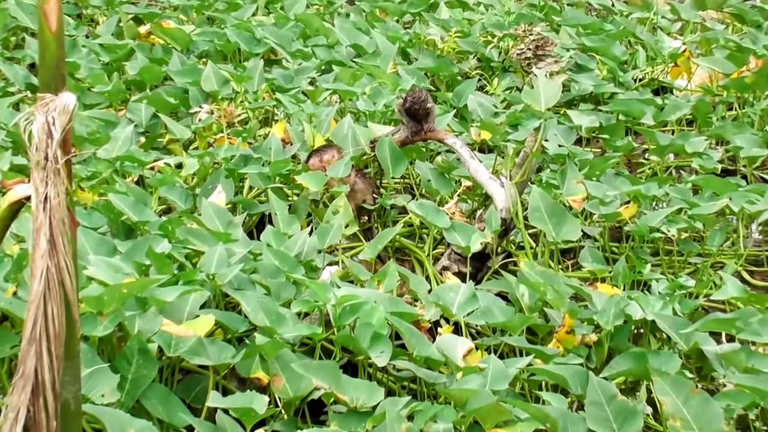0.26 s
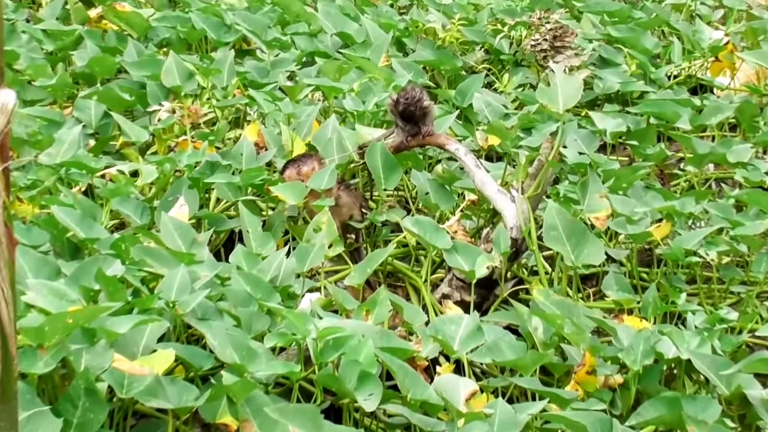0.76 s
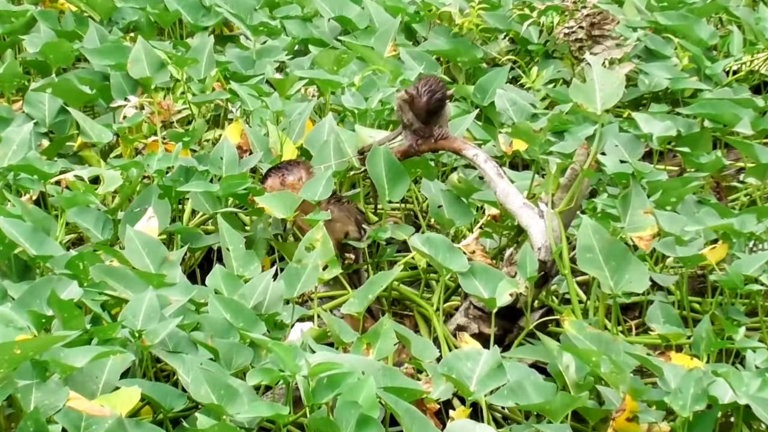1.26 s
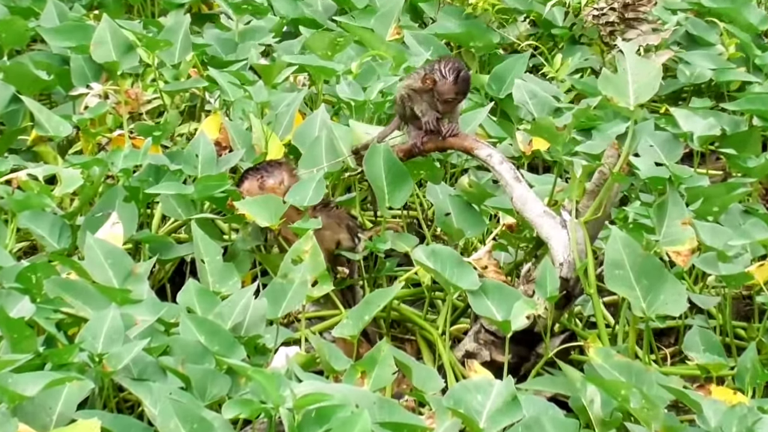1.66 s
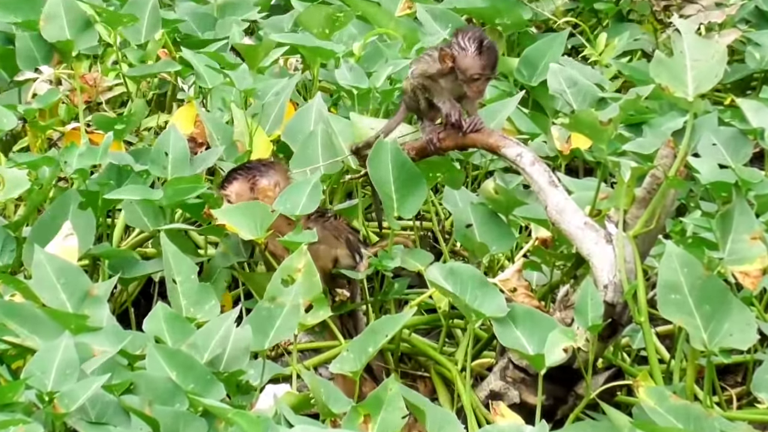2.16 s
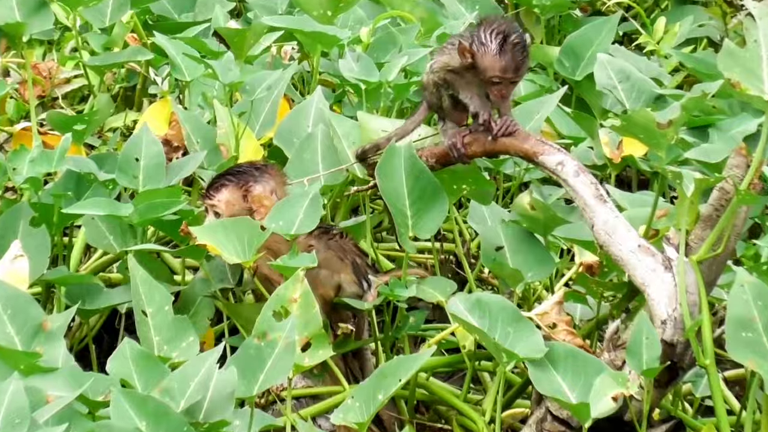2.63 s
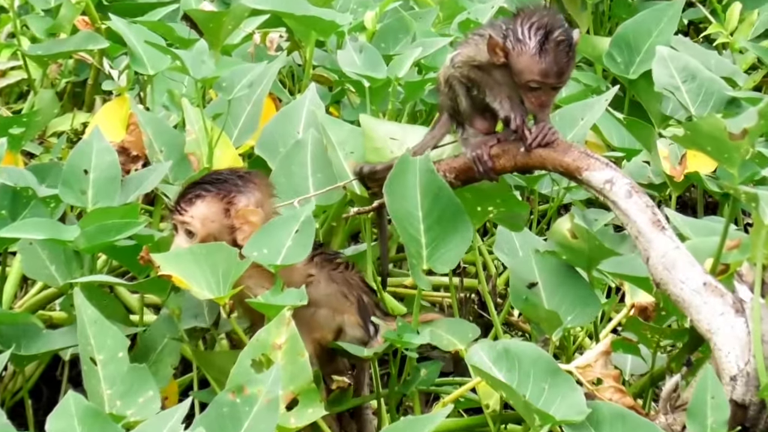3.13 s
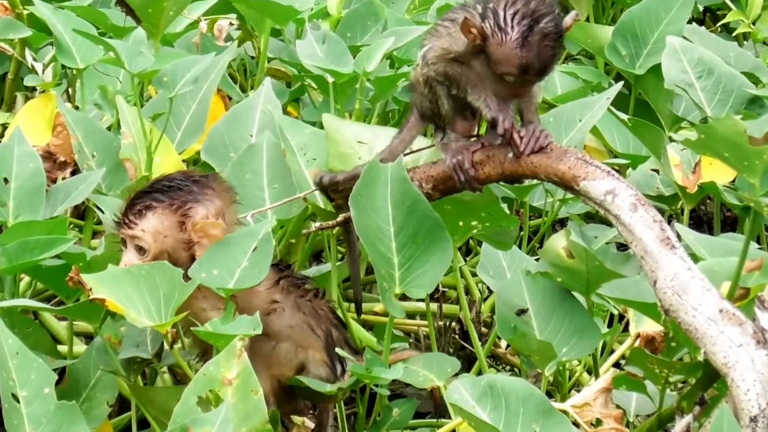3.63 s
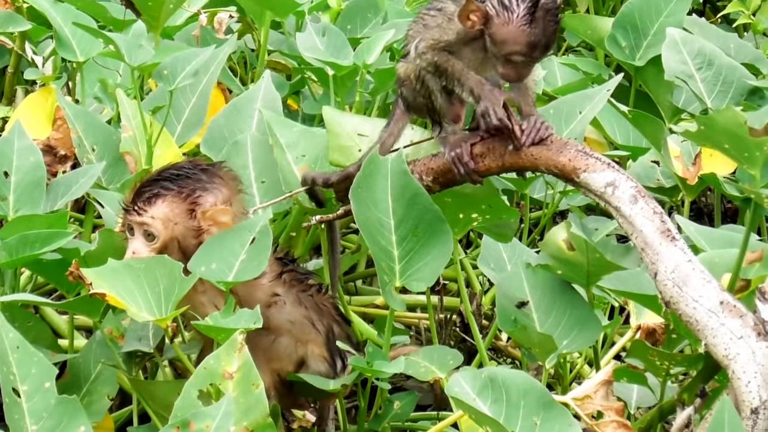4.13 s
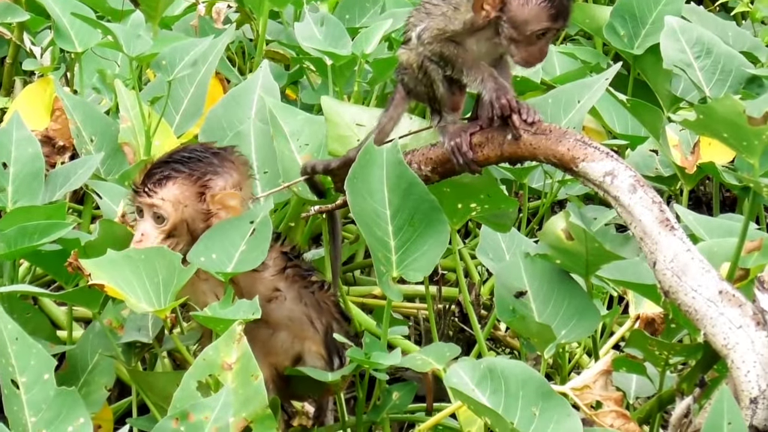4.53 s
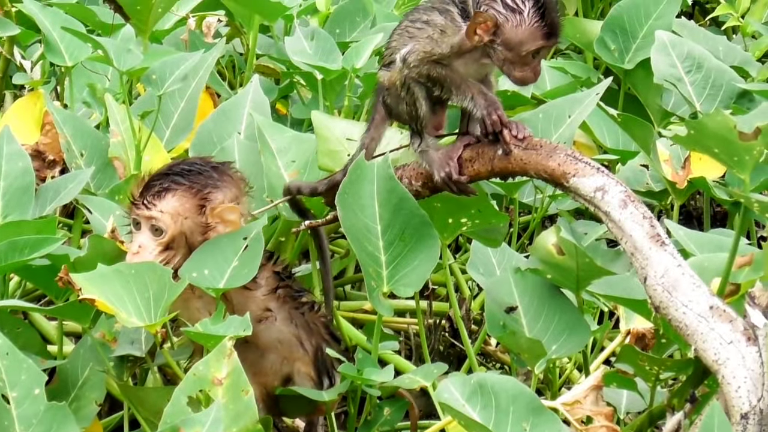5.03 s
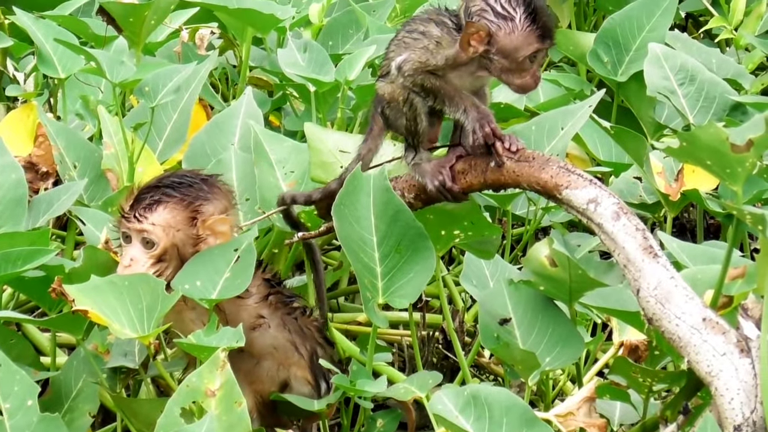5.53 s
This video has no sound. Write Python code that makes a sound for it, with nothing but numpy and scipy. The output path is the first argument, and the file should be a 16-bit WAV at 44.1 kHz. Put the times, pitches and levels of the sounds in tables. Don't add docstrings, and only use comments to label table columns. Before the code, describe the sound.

Outdoors in thick foliage, insects trill and wind rumbles while small monkeys chirp, coo, and finally scream sharply twice.

```python
import sys
import numpy as np
from scipy import signal
from scipy.fft import rfft, irfft, next_fast_len
from scipy.io import wavfile
from scipy.ndimage import uniform_filter1d, minimum_filter1d, map_coordinates

SR = 44100
rng = np.random.default_rng(int(sys.argv[2]) if len(sys.argv) > 2 else 0)


def store_wav(level_fs):
    pcm = np.round(np.clip(np.atleast_2d(level_fs), -1, 1) * 32767)
    wavfile.write(sys.argv[1], SR, pcm.T.astype(np.int16))


def elevation(decibels):
    levels = np.asarray(decibels, float)
    return 10 ** (levels / 20)


N = 254898

# f/Hz, level/dB
THROAT_OPEN = [(1000, -12), (2500, -4), (4000, 4.5), (5300, 0), (6300, -11.5), (7300, 15), (9000, -25),
               (10500, -1.5), (12000, -34.5)]


def unit(x):
    return x / np.sqrt(np.mean(x ** 2) + 1e-20)


def along(points, hz):
    f, v = np.transpose(points)
    return np.interp(np.log(hz + 1), np.log(f + 1), v)


def curves(rows, t):
    s, *cols = np.transpose(rows)
    return [np.interp(t, s, c) for c in cols]


def wobble(rate, size=N):
    knots = rng.standard_normal(size // 8 + 9)
    return map_coordinates(knots, [np.arange(size) * rate / SR])


def ramp(t, start, length):
    return np.clip((t - start) / length, 0, 1)


def swells(rows, t):
    total = 0
    for s, rise, fall, *db in rows:
        distance = np.where(t < s, (s - t) / rise, (t - s) / fall)
        total = total + elevation(np.array(db)[:, None] - 20 * distance)
    return total


def filtered(x, response):
    m = next_fast_len(N + SR // 2)
    return irfft(rfft(x, m) * response(np.fft.rfftfreq(m, 1 / SR)), m)[..., :N]


def resonance(centre, width):
    return lambda f: 1j * f * width / (centre * centre - f * f + 1j * f * width)


def placed(x, pan_db, lead):
    side = np.array([[.5], [-.5]])
    return filtered(x, lambda hz: elevation(pan_db(hz) * side) * np.exp(1j * lead(hz) * side))


def direction(pan_db, lead_s):
    return lambda hz: pan_db + 0 * hz, lambda hz: 2 * np.pi * hz * lead_s


def rush(gain, patchy_db):
    # f/Hz, likeness (0 to 1)
    alike = [(60, 1), (290, 0.85), (640, 0.018), (1400, 0.7), (3100, 1), (6000, 1), (8000, 0.67),
             (10000, 0.03)]
    # f/Hz, left minus right/dB
    lean = [(60, -5.5), (200, -2.5), (700, -0.5), (1300, 0)]
    z = signal.stft(rng.standard_normal((2, N)), nperseg=512)[2]
    field = uniform_filter1d(rng.standard_normal(z.shape[1:]), size=5, axis=0)
    field = uniform_filter1d(field, size=9, axis=1)
    pair = signal.istft(z * elevation(patchy_db * unit(field)), nperseg=512)[1][:, :N]

    def mid_side(hz):
        turn = np.arccos(np.clip(along(alike, hz), -1, 1)) / 2
        return gain(hz) * [np.cos(turn), np.sin(turn)]

    mid, side = filtered(pair, mid_side)
    stereo = np.array([mid + side, mid - side])
    return unit(filtered(stereo, lambda hz: elevation(np.outer([.5, -.5], along(lean, hz)))))


def voice(calls, throat, jitter, shimmer_db, edge_s, count, open_db=0, effort=0):
    out = np.zeros(N)
    for rows in calls:
        i = np.arange(round(rows[0][0] * SR), round(rows[-1][0] * SR))
        size = len(i)
        hz, db = (uniform_filter1d(c, size=200) for c in curves(rows, i / SR))
        unsteady = 1 + jitter * wobble(294.3, size) + 0.00595 * wobble(25.4, size)
        phase = 2 * np.pi * np.cumsum(hz * unsteady) / SR
        fade = np.clip(np.minimum(i - i[0], i[-1] - i) / (edge_s * SR), 0, 1)
        for k in range(1, count + 1):
            level = db + along(throat, k * hz) - along(throat, hz) + shimmer_db * wobble(260, size)
            if k > 1:
                level = level + open_db + effort * np.log2(k) * (db - db.max())
            if k > 2:
                level = level + 2.5 * wobble(25, size)
            audible = k * hz < SR / 2.3
            out[i] += np.sqrt(2) * fade * elevation(level) * audible * np.sin(k * phase + k)
    return out


def glide(rows, peak, head_db, tail_db, early=0):
    return [[(s, a, db - head_db),
             (s + peak * length, a + (peak + early) * (b - a), db),
             (s + length, b, db - tail_db)] for s, length, a, b, db in rows]


def arch(rows, rise, fall, head_db, tail_db):
    u = np.linspace(-1, 1, 41)
    bow = np.where(u < 0, abs(u) ** rise, abs(u) ** fall)
    drop_db = np.where(u < 0, head_db, tail_db) * bow
    return [np.transpose([s + length * (u + 1) / 2, top + (end - top) * bow, db - drop_db])
            for s, length, top, end, db in rows]


def weather():
    # t/s, level/dB
    wind = [(0, -34.5), (2.4, -34.5), (4.1, -36), (4.4, -36), (5.4, -35), (5.78, -34)]
    # f/Hz, level/dB per Hz
    rumble_colour = [(13, -48), (22, -18), (36, -15), (54, -2.5), (141, 0.5), (214, -4), (242, -4),
                     (275, -11), (300, -16), (341, -22.5), (392, -30.5), (422, -44), (450, -56), (580, -78),
                     (990, -120)]
    # f/Hz, level/dB per Hz
    air = [(210, -9), (350, -3.5), (422, -1), (693, -1.5), (922, -10.5), (2010, -16), (2650, -20.5),
           (4400, -23.5), (4800, -30.5), (6800, -25), (8840, -61), (15000, -120)]
    air_top = [(8500, -13.5), (10600, -18), (12500, -23), (15600, -25.5)]
    hiss_colour = [p for p in air if p[0] < 7000] + air_top
    rumble = rush(lambda hz: elevation(along(rumble_colour, hz)), patchy_db=-0.73)
    hiss = rush(lambda hz: elevation(along(hiss_colour, hz)), patchy_db=2.0)
    gust_db = curves(wind, np.arange(N) / SR)[0] + 0.36 * wobble(4.3)
    return elevation(gust_db) * rumble + elevation(-61 + 1.5) * hiss


def chorus():
    # f/Hz, width/Hz, level/dB, pulse rate/Hz
    bands = [(7610, 180, -77.5, 16), (7950, 55, -73, 110), (9440, 640, -68, 33)]
    t = np.arange(N) / SR
    out = 0
    for centre, width, db, rate in bands:
        band = rush(lambda hz: abs(resonance(centre, width)(hz)) ** 2, patchy_db=1.0)
        out = out + elevation(db + wobble(6.13) + 2 * np.sin(2 * np.pi * rate * t)) * band
    return out


def katydid():
    # first end t/s, last end t/s, first level/dB, last level/dB
    bouts = [(0.028, 1.382, -54.5, -53.5), (4.706, 5.77, -58, -54)]
    # f/Hz, level/dB
    wing = [(7600, -40), (8400, -17), (8750, -2), (9050, 0), (9400, -4), (9800, -5), (10100, -20),
            (11000, -45)]
    t = np.arange(N) / SR
    phrase_s, tooth_hz = .121, 9105
    swell = 0
    for a, b, first_db, last_db in bouts:
        for end, db in np.linspace((a, first_db), (b, last_db), round((b - a) / phrase_s) + 1):
            rise = np.clip((t - end + 0.14) / 0.078, 0, 1) ** 1.13
            swell = swell + elevation(db - 4.5) * rise * np.clip((end - t) / 0.016, 0, 1)
    stroke = 2 * np.pi * 125.3 * t
    scrape = np.exp(.55 * np.cos(stroke) + .4 * np.cos(3 * stroke)) * rng.standard_normal((2, N))
    comb = 1 + .5 * np.cos(stroke) + 1.8 * np.cos(2 * stroke)
    scrape[0] += .12 * comb * np.sin(2 * np.pi * tooth_hz * t + .6 * wobble(30))
    ring = filtered(scrape[0] + scrape * [[0], [1]], lambda hz: elevation(along(wing, hz)))
    return swell * unit(ring)


def cricket():
    # start t/s, end t/s, level/dB
    bouts = [(-.1, .645, -75), (1.41, 3.12, -76.5), (3.12, 4, -84), (4, 4.8, -77), (4.8, 5.4, -83),
             (5.4, 5.9, -78)]
    t = np.arange(N) / SR
    beat = ((t - 1.716) * 22.0 + .25) % 1 / 22.0 - .25 / 22.0
    pulses = np.exp(-(beat / 0.0036) ** 2)
    pulses += np.exp(-((beat - .0145) / 0.005) ** 2)
    pulses += np.exp(-((beat - .029) / 0.001) ** 2)
    gain = sum(elevation(db) * (ramp(t, a - .03, .06) - ramp(t, b - .03, .06)) for a, b, db in bouts)
    return gain * elevation(5 + 2 * wobble(20)) * pulses * np.sin(2 * np.pi * 4920 * t + wobble(80))


def snaps():
    # t/s, peak level/dB, knock f/Hz, crack level/dB
    hits = [(0.071, -72, 600, -3.5), (0.3511, -45.5, 593, -27), (0.61, -62, 730, -24),
            (1.254, -70, 660, -10), (3.6499, -42.5, 727, -14.5), (3.878, -76, 606, -16),
            (5.078, -70, 724, -11)]
    # f/Hz, width/Hz, level/dB
    modes = [(1380, 88, -5), (1790, 160, 3), (2090, 200, -13), (2800, 200, 5), (3330, 160, 3),
             (4260, 380, -28)]
    tone = [(300, -24), (800, 17.0), (3500, 11.0), (8000, 14.5), (16000, -9)]  # f/Hz, level/dB
    out, t = np.zeros(N + SR), np.arange(SR // 10) / SR
    for s, db, hz, crack_db in hits:
        crack = ramp(t, 0, 0.0017) * elevation(crack_db + 15.0 - 60 * t / 0.015) * rng.standard_normal(len(t))
        knock = ramp(t, 0.00067, 0.0017) * elevation(-60 * t / 0.026)
        knock = knock * np.sin(2 * np.pi * hz * (t + 10.3 * t * t))
        out[round(s * SR):][:len(t)] += elevation(db + 6.5) * (crack + knock)

    def wood(hz):
        ringing = sum(elevation(db) * resonance(c, w)(hz) for c, w, db in modes)
        return elevation(along(tone, hz)) * (0.3 + ringing)

    return filtered(out[:N], wood)


def bird():
    # start t/s, length/s, from f/Hz, to f/Hz, peak level/dB
    pipes = [(.2, 0.11, 1300, 1594, -70), (.57, 0.097, 1320, 1790, -69), (4.062, 0.021, 1420, 1700, -48),
             (4.14, 0.1, 1450, 1770, -66), (4.77, 0.098, 1394, 1860, -67), (5.59, 0.11, 1400, 1880, -68)]
    return voice(glide(pipes, .7, 9, 3), THROAT_OPEN, .006, 2, .015, count=1)


def middle_monkey():
    # start t/s, length/s, from f/Hz, to f/Hz, peak level/dB
    chirp_rows = [
        (1.165, 0.028, 1213, 1320, -41.5),
        (2.88, 0.057, 1152, 1202, -44),
        (2.99, 0.055, 1326, 1245, -39.5),
        (4.941, 0.048, 990, 1087, -49.5),
    ]
    # t/s, pitch f/Hz, fundamental level/dB
    long_coo = [(2.13, 1072, -52), (2.16, 1112, -45), (2.242, 1178, -41.5), (2.29, 1126, -46.5),
                (2.36, 1243, -38), (2.604, 1325, -37), (2.66, 1310, -44), (2.68, 1180, -58)]
    # f/Hz, level/dB
    throat_chirp = [(900, 3), (1300, 4.5), (1800, -16), (2500, -22.5), (3600, -13.5), (5100, -25),
                    (6500, -45)]
    throat_shut = [(1100, -3.5), (2000, -28), (3200, -25), (4200, -49)]
    throat_coo = [(500, 80), (1300, 8.5), (2500, -17), (3800, -14.5), (5200, -52), (6300, -32), (7700, -49),
                  (9000, -22.5), (10400, -25.5), (13000, -64)]
    first, *chirps, hum = glide(chirp_rows, peak=0.57, head_db=-2.3, tail_db=7, early=0.26)
    calls = voice([first], throat_chirp, 0.0034, 0.64, 0.0056, count=4, effort=1.5)
    calls += voice(chirps, throat_chirp, 0.0018, 0.58, 0.011, count=4, open_db=-9.0)
    calls += voice([hum], throat_shut, 0.0038, 1.7, 0.0066, count=3)
    calls += voice([long_coo], throat_coo, 0.0013, 0.18, 0.011, count=9)
    return placed(calls, *direction(3.0, 2e-5))


def far_monkey():
    # start t/s, length/s, from f/Hz, to f/Hz, peak level/dB
    peep = [(1.26, 0.094, 572, 542, -57)]
    # start t/s, length/s, top f/Hz, end f/Hz, peak level/dB
    coo = [(3.24, .32, 582, 450, -53)]
    # f/Hz, level/dB
    throat = [(400, -14), (700, 2), (900, -24), (1040, -16), (1170, -25), (2000, -40)]
    calls = arch(coo, rise=2.23, fall=1.5, head_db=-2.5, tail_db=2.0)
    calls += glide(peep, peak=0.22, head_db=1, tail_db=8)
    return placed(voice(calls, throat, 0.013, 0.98, 0.017, count=3), *direction(.4, 1e-4))


def left_monkey():
    # start t/s, length/s, from f/Hz, to f/Hz, peak level/dB
    yelp = [(1.31, 0.0316, 774, 1190, -48.5)]
    # t/s, pitch f/Hz, fundamental level/dB
    soft_coo = [(1.83, 790, -59.5), (1.862, 822, -59.5), (1.938, 882, -48.5), (2.05, 889, -46),
                (2.132, 876, -49), (2.178, 845, -50.5), (2.206, 799, -58.5), (2.225, 754, -63),
                (2.25, 700, -66)]
    wide_coo = [(2.435, 716, -58), (2.473, 838.6, -53.5), (2.491, 882, -51.5), (2.535, 934, -51),
                (2.671, 908, -51), (2.731, 849, -54.5), (2.741, 818, -62.5), (2.755, 724, -63),
                (2.775, 685, -67)]
    cry_start = [(3.015, 876, -55.5), (3.045, 1058, -62), (3.098, 1072, -57.5)]
    cry = [(3.088, 1093, -50), (3.11, 1260, -43), (3.129, 1326, -40), (3.161, 1168, -43.5),
           (3.198, 1167, -45), (3.24, 1083, -51.5), (3.298, 1066, -51), (3.376, 932, -55.5),
           (3.407, 789, -69)]
    # f/Hz, level/dB
    throat_yelp = [(800, -2), (1000, 3.5), (1750, -5), (2150, -29), (2600, -30), (3100, -12), (3600, -7),
                   (4300, -21), (5500, -30)]
    throat_coo = [(600, 19.5), (960, 2), (1300, 11), (1800, 6.5), (2700, -18.5), (3600, -5.5), (4500, -25),
                  (5300, -25), (6500, -79), (12000, -69)]
    throat_cry = [(800, -2), (1300, 7), (1900, 4), (2600, -19), (3600, 5), (4400, -20.5), (5300, -10.5),
                  (6000, -30), (6600, -18), (8000, -49)]
    yelps = glide(yelp, peak=0.37, head_db=9.0, tail_db=9)
    calls = voice(yelps, throat_yelp, 0.0065, 2.3, 0.0093, count=5, open_db=2.0)
    for coo, open_db in ((soft_coo, 0.1), (wide_coo, 7)):
        calls += voice([coo], throat_coo, 0.0013, 0.19, 0.0027, count=9, open_db=open_db, effort=0.25)
    calls += voice([cry_start, cry], throat_cry, 0.0035, 1.1, 0.0093, count=6)
    return placed(calls, *direction(9.6, 9e-5))


def wheeze():
    # peak t/s, rise/s, fall/s, level/dB
    breaths = [(1.4, 0.53, 3, -79.5), (2, 0.42, 1.64, -79), (4, .05, 0.64, -70.5), (4.2, 0.42, 0.17, -87),
               (4.5, 0.11, 0.19, -56), (5.45, 0.058, 0.17, -72)]
    air = filtered(rng.standard_normal(N), lambda hz: resonance(3520, 350)(hz) ** 2)
    gain = swells(breaths, np.arange(N) / SR)[0] * elevation(1.2 * wobble(28))
    return placed(gain * unit(air), *direction(0.49, 1e-5))


def frog():
    # peak t/s, rise/s, fall/s, level/dB
    croaks = [(1.6, 2.6, 1.3, -74), (2.95, 0.46, 0.49, -80), (3.55, 0.77, .25, -72), (4.7, 2.4, 5.9, -86)]
    t = np.arange(N) / SR
    bunch = np.exp(1.6 * np.cos(2 * np.pi * 25.5 * (t - 3.52) + .5 * wobble(6)))
    ticks = (rng.random(N) < 200 / SR * bunch) * (1 + .3 * rng.standard_normal(N))
    sac = lambda hz: resonance(2000, 350)(hz) ** 2 - 0.59 * resonance(1400, 200)(hz) ** 2
    return swells(croaks, t)[0] * unit(filtered(ticks, sac))


def shriek_tones():
    # t/s, pitch f/Hz, level/dB
    lead_in = [(4.209, 1640, -53), (4.222, 2250, -65), (4.232, 2660, -56), (4.244, 2740, -62),
               (4.252, 3080, -62), (4.264, 3540, -67)]
    whistle = [
        [(4.274, 4055, -38.5), (4.29, 4800, -35), (4.306, 5760, -31.5), (4.326, 7670, -34), (4.337, 8850, -22),
         (4.349, 9030, -26), (4.365, 9050, -19.5), (4.381, 7700, -22), (4.389, 7250, -39.5)],
        [(5.208, 4800, -34), (5.213, 5310, -27.5), (5.22, 5770, -21.5), (5.227, 6050, -27), (5.23, 6200, -29),
         (5.237, 6700, -39)],
        [(5.237, 6920, -30), (5.243, 7500, -15), (5.252, 8450, -17.5), (5.262, 9400, -29), (5.28, 9540, -32),
         (5.292, 9830, -28), (5.31, 9860, -29)],
        [(5.308, 9270, -27), (5.325, 9150, -32), (5.34, 8900, -21.5), (5.347, 7860, -28.5), (5.354, 7300, -40)],
    ]
    break_down = [(4.387, 5206, -42), (4.398, 4370, -36), (4.403, 4180, -25.5), (4.411, 3880, -25.5),
                  (4.415, 3680, -30), (4.425, 3577, -31), (4.43, 3330, -22), (4.437, 3200, -30)]
    slump = [
        [(4.431, 3000, -42), (4.437, 2740, -35), (4.45, 2380, -35), (4.457, 2230, -42), (4.473, 1960, -52)],
        [(5.372, 3150, -44), (5.385, 2850, -43), (5.393, 2560, -41), (5.402, 2300, -46)],
    ]
    # start t/s, length/s, from f/Hz, to f/Hz, peak level/dB
    last_falls = [
        (4.468, 0.037, 1455, 1110, -55.5),
        (5.405, 0.039, 1454, 1190, -56),
    ]
    second = [(4.295, 0.023, 6300, 7700, -38), (4.309, .019, 7050, 7210, -28),
              (4.329, 0.019, 6630, 6800, -34), (4.349, 0.012, 6850, 7000, -40),
              (5.201, 0.015, 3630, 4160, -41), (5.214, 0.026, 4050, 4550, -39.5),
              (5.22, 0.018, 7350, 8800, -47), (5.228, .011, 7100, 7460, -48), (5.242, .01, 7170, 7700, -23),
              (4.385, 0.018, 8500, 9400, -52), (4.31, .012, 5500, 6400, -33)]
    cracked = [(5.362, .008, 4700, 4400, -34), (5.366, .019, 4050, 4150, -23),
               (5.385, .016, 3850, 3850, -36), (5.401, .021, 4150, 3800, -28),
               (5.362, .02, 3300, 3150, -32), (4.439, .008, 3450, 3350, -35),
               (5.363, .012, 5400, 5200, -43), (5.403, .014, 3300, 3150, -40),
               (5.355, .03, 8800, 7800, -43), (5.391, .03, 7600, 7050, -35), (5.422, .025, 2700, 2300, -50),
               (5.425, .035, 3900, 4000, -48)]
    # f/Hz, level/dB
    throat_lead = [(1500, 7), (3500, -5), (4100, -8), (4650, 19.5), (5100, -9), (6000, -29)]
    throat_slump = [(2000, -2), (2500, 0), (3200, 0), (4000, 5), (4800, 4), (5500, 2), (6500, -10),
                    (7500, -4), (8500, -8)]
    whistle_throat = [(11500, 0), (12500, 16)]
    tones = voice([lead_in], throat_lead, .015, 3.5, .004, count=2)
    tones += voice(whistle, whistle_throat, .008, 4.5, .002, count=2, open_db=-50)
    tones += voice([break_down], THROAT_OPEN, .005, 2, .003, count=3, open_db=-5)
    tones += voice(slump, throat_slump, .004, 2, .003, count=3)
    tones += voice(glide(last_falls, .8, 7, 3), THROAT_OPEN, .015, 3, .003, count=1)
    tones += voice(glide(second, .55, 5, 4), THROAT_OPEN, .012, 4, .003, count=1)
    rattle = 1 + .45 * np.cos(2 * np.pi * 694 * np.arange(N) / SR + 3 * wobble(300))
    return tones + rattle * voice(glide(cracked, .3, 3, 4), THROAT_OPEN, .012, 3, .002, count=1)


def throat_rasp():
    # peak t/s, rise/s, fall/s, low level/dB, high level/dB
    puffs = [(4.3, 0.018, 0.035, -57, -48), (4.37, 0.034, 0.051, -82, -48), (5.29, .04, 0.041, -82, -42.5),
             (4.33, 0.022, 0.054, -67, -41), (4.44, 0.022, 0.054, -35.5, -33.5),
             (4.52, 0.048, 0.1, -58, -64), (5.245, 0.02, 0.03, -55, -25), (5.345, 0.051, 0.021, -81, -43.5),
             (5.364, 0.0018, 0.08, -40.5, -40), (5.39, 0.014, 0.027, -42, -39),
             (5.42, 0.035, 0.015, -45, -51), (5.45, 0.023, 0.17, -58, -67)]
    # f/Hz, level/dB
    low_colour = [(800, -50), (1900, -33), (2700, -11), (3500, 0), (4800, -5), (5800, -12), (8000, -40)]
    high_colour = [(3000, -46), (3700, -21), (4500, -18), (6000, -9), (7400, -2.5), (9000, -4.5),
                   (10500, -15.5), (12000, -20), (15500, -26)]
    out = np.zeros(N)
    for gain, colour in zip(swells(puffs, np.arange(N) / SR), (low_colour, high_colour)):
        air = unit(filtered(rng.standard_normal(N), lambda hz: elevation(along(colour, hz))))
        out += gain * elevation(1.5 * wobble(150)) * air
    return out


def spray():
    # peak t/s, rise/s, fall/s, f/Hz, level/dB
    spits = [(4.305, 0.024, .06, 12700, -48), (4.335, .03, .04, 15600, -50), (4.34, .03, .04, 18000, -49.5),
             (4.425, .015, 0.058, 15100, -57), (4.44, .03, .05, 8400, -51),
             (4.43, 0.025, 0.034, 11000, -42), (5.245, .04, 0.027, 12500, -43),
             (5.255, 0.045, .04, 14800, -57), (5.342, 0.036, .07, 14700, -48), (5.34, .03, .05, 10800, -42)]
    out = np.zeros(N)
    for s, rise, fall, hz, db in spits:
        i = np.arange(round((s - .1) * SR), round((s + .15) * SR))
        lumps = elevation(4 * wobble(120, len(i))) * wobble(1100, len(i))
        tone = np.cos(2 * np.pi * hz * i / SR + 2 * wobble(300, len(i)))
        out[i] += swells([(s, rise, fall, db)], i / SR)[0] * lumps * tone
    return out


def shrieks():
    # f/Hz, left minus right/dB
    pan = [(2000, 7), (5000, 5), (8500, 7.5), (12000, -2)]
    # f/Hz, left lead/rad
    lead = [(1000, .5), (3500, 0), (7400, .1), (8700, 2.4), (10000, 1), (12000, 1.5)]
    mouth = shriek_tones() + throat_rasp() + spray()
    return placed(mouth, lambda hz: along(pan, hz), lambda hz: along(lead, hz))


def thicket(x):
    # f/Hz, t60/s
    decay = [(500, 0.088), (3500, 0.047), (8000, 0.052), (14000, 0.25)]
    hz, t, z = signal.stft(rng.standard_normal((2, SR // 2)), SR, nperseg=256)
    fading = z * elevation(-60 * t / along(decay, hz)[:, None])
    tail = signal.istft(fading, SR, nperseg=256)[1]
    late = np.pad(x, ((0, 0), (300, 0)))
    return signal.fftconvolve(late, tail / np.linalg.norm(tail[0]), axes=1)[:, :N]


def scene():
    near = snaps() + bird() + middle_monkey() + far_monkey() + left_monkey() + shrieks()
    leaf_wall = elevation(-25) * np.roll(near, round(.033 * SR), axis=1)
    insects = katydid() + cricket() + chorus()
    return near + leaf_wall + elevation(-8.0) * thicket(near) + insects + frog() + wheeze() + weather()


def top_cut(x):
    return signal.sosfilt(signal.butter(12, 15530, fs=SR, output="sos"), x)


def record(dry):
    # start t/s, attack/s, hold/s, recovery/s, depth/dB
    ducks = [
        (4.323, 0.048, 0.09, 0.45, -3),
        (5.213, 0.009, 0.099, 0.21, -6.5),
    ]
    t = np.arange(N) / SR
    gain_db = 2.5
    for s, attack, hold, recovery, db in ducks:
        release = np.exp(-np.maximum(t - s - attack - hold, 0) / recovery)
        gain_db = gain_db + db * ramp(t, s, attack) * release
    ducked = dry * elevation(gain_db)
    needed = np.minimum(1, .27 / (abs(ducked).max(axis=0) + 1e-9))
    limited = ducked * uniform_filter1d(minimum_filter1d(needed, size=133), size=88)
    return top_cut(limited)


dry = scene()
out = record(dry)
store_wav(out)
```